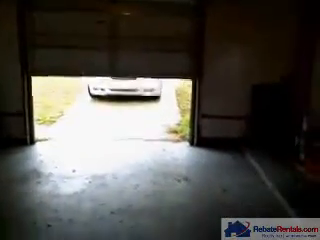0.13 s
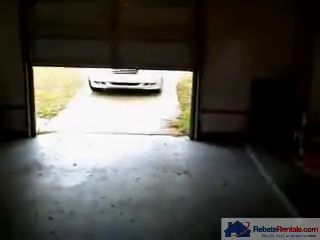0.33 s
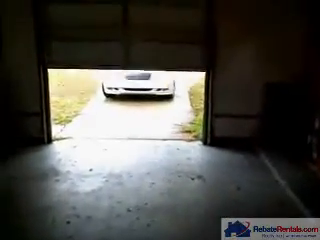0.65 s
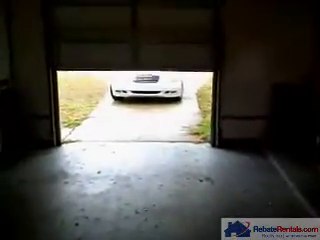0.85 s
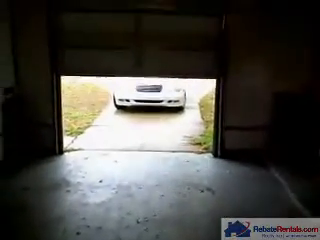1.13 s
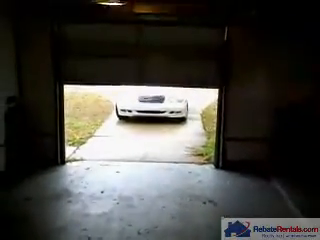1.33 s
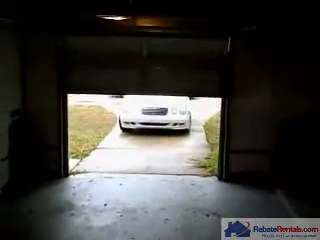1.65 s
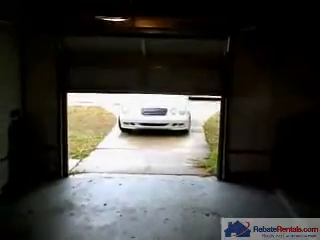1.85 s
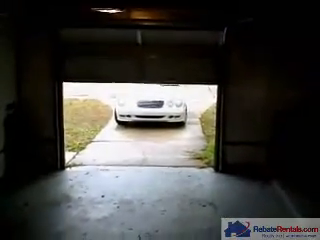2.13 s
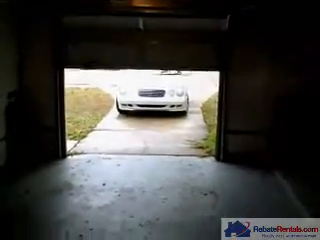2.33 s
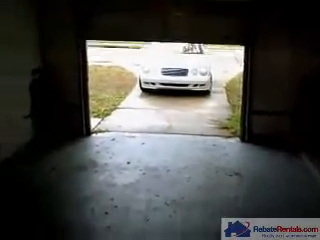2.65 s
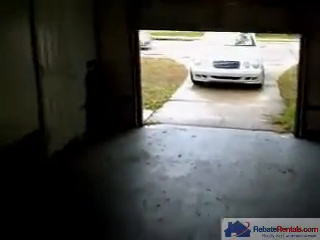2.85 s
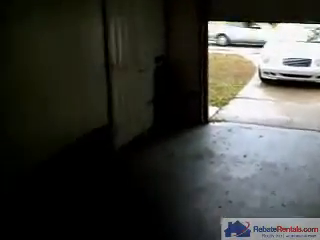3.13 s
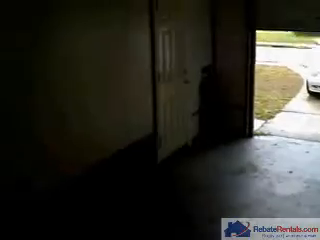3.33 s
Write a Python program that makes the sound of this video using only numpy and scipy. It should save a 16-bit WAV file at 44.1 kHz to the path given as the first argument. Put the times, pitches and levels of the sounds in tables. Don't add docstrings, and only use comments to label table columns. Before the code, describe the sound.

A sectional garage door is hauled up by an electric opener: steady low hum, dense chain and roller rattle, scattered hinge clacks, and a deepening bass shudder near the end, heard by a small microphone inside a bare concrete garage.

```python
import sys
import numpy as np
from scipy import signal
from scipy.fft import rfft, irfft, next_fast_len
from scipy.io import wavfile
from scipy.ndimage import uniform_filter1d

SR = 44100
rng = np.random.default_rng(int(sys.argv[2]) if len(sys.argv) > 2 else 0)


def wav_record(signal):
    frames = np.transpose(np.atleast_2d(signal))
    bounded = np.clip(frames, -1, 1)
    quanta = np.round(bounded * 32767).astype(np.int16)
    wavfile.write(sys.argv[1], SR, quanta)


def natural_amplitude(level_db):
    exponent = np.asarray(level_db, float) / 20
    return 10 ** exponent


N = 154350


def level(x, db):
    return x * natural_amplitude(db) / np.sqrt(np.mean(x ** 2))


def curve(rows, col):
    rows = np.array(rows)
    return np.interp(np.arange(N) / SR, rows[:, 0], rows[:, col])


def colour(x, points):
    size = next_fast_len(len(x) + 4096)
    log_hz = np.log(np.arange(size // 2 + 1) * SR / size + 1)
    p = np.array(points, float)
    edge = np.log(p[:, 0])
    beyond = np.maximum(edge[0] - log_hz, 0) + np.maximum(log_hz - edge[-1], 0)
    db = np.interp(log_hz, edge, p[:, 1]) - 18 * beyond
    return irfft(rfft(x, size) * natural_amplitude(db), size)[:len(x)]


def ring(x, hz, width_hz):
    return signal.lfilter(*signal.iirpeak(hz, hz / width_hz, fs=SR), x)


def walk(rate):
    hold = int(SR / rate)
    steps = np.repeat(rng.standard_normal(N // hold + 1), hold)
    return 1.72 * uniform_filter1d(uniform_filter1d(steps, hold), hold)[:N]


def decay(t60_s):
    t = np.arange(SR // 2) / SR
    noise = rng.standard_normal(len(t)) * np.exp(-np.log(1000) * t / t60_s)
    return level(noise, 0) / np.sqrt(len(t))


def garage(x):
    early = decay(0.048)
    tail = natural_amplitude(4.5) * decay(0.37)
    return signal.fftconvolve(x, early + tail)[:len(x)]


# t/s, level/dB
HUM_LEVEL = [(0.0, -37), (0.04, -30), (1.42, -25), (1.77, -29), (1.84, -26.5), (2.14, -36), (2.2, -24.5),
             (2.27, -30.5), (2.68, -29), (2.76, -42), (2.89, -29.5), (2.96, -32), (3.33, -28.5), (3.5, -36)]
# multiple of the hum, level/dB, level change/(dB per s)
HUM_OVERTONES = [(2, -11.5, -1.3), (5, -28, .5)]


def motor():
    t = np.arange(N) / SR
    phase = 2 * np.pi * 120 * t
    hum = np.sin(phase) * natural_amplitude(curve(HUM_LEVEL, col=1))
    mean = np.sqrt(np.mean(2 * hum ** 2))
    tones = 0
    for multiple, db, fade_db in HUM_OVERTONES:
        strength = mean * natural_amplitude(db + fade_db * t + walk(4.9))
        tones = tones + strength * np.sin(multiple * phase + walk(3) / 10)
    housing_hz, width_hz = 108.2, 16.6
    housing = ring(ring(rng.standard_normal(N), housing_hz, width_hz), housing_hz, width_hz)
    return np.sqrt(2) * (hum + tones) + level(housing, -36)


# f/Hz, level/dB per Hz
RUMBLE_COLOUR = [(22, 0), (45, -0.5), (95, -4), (185, -3.5), (260, -6.5), (430, -12), (620, -10.5),
                 (1000, -20)]
# t/s, level/dB
RAIL_LOAD = [(0, -32.5), (1.3, -32.5), (1.7, -33), (2.2, -30.5), (2.6, -28.5), (3.0, -26), (3.5, -30.5)]


def rumble():
    noise = level(colour(rng.standard_normal(N), RUMBLE_COLOUR), 0)
    bass = signal.sosfilt(signal.butter(2, 260, fs=SR, output="sos"), noise)
    return bass * natural_amplitude(curve(RAIL_LOAD, col=1)) + level(noise - bass, -34)


# t/s, level/dB, share of thin bright jingle level/dB
ROLLER_EFFORT = [(0, -38.5, 5.5), (.1, -30, -14), (.3, -30, -4), (.47, -34.5, -8), (.75, -33.5, 1.5),
                 (.9, -34.5, -2), (1.3, -35, -5.5), (1.43, -35.5, -12), (1.66, -27, -5), (1.88, -32, -15),
                 (2.06, -28, -8), (2.15, -30, -9), (2.35, -30.5, 2.5), (2.58, -29, -13), (2.8, -30, -5),
                 (3.13, -33.5, -15), (3.25, -30.5, -11.5), (3.5, -31.5, -9.5)]
# f/Hz, level/dB per Hz
RATTLE_COLOUR = [(500, -3), (1000, -7.5), (1400, -5.5), (3000, -8), (4300, -7), (5200, -5), (6100, -3.5),
                 (7700, -6.5)]


def rollers():
    size, places = N + SR // 2, 16
    ticks_per_s, spread_db = 2500, 3
    chance = rng.random((size, 2))
    struck = chance[:, 0] < ticks_per_s / SR
    ticks = struck * natural_amplitude(-spread_db * np.log(chance[:, 1] + .004))
    place = rng.integers(0, places, size)
    heard = sum(garage(ticks * (place == k)) for k in range(places))[-N:]
    heard = level(heard * natural_amplitude(0.74 * walk(16)), 0)
    jingle = natural_amplitude(curve(ROLLER_EFFORT, col=2)) * ring(heard, 6150, 1500)
    return colour((heard + jingle) * natural_amplitude(curve(ROLLER_EFFORT, col=1)), RATTLE_COLOUR)


# t/s, peak level/dB, ring f/Hz, ring share level/dB, chatter length/s
HINGE_CLACKS = [(0.075, -27.5, 3000, 3, .025), (.099, -20, 5900, -1.5, 0.028), (.16, -13, 6050, 0.5, 0.039),
                (0.2321, -7.5, 5260, -3, .026), (.5, -24, 5700, -0.5, .025), (1.457, -21, 6270, -11.5, .02),
                (1.534, -18.5, 6000, -9.5, 0.023), (1.6, -20, 6050, 0, 0.02), (1.649, -23.5, 6110, 1, .03),
                (1.758, -16.5, 6200, -2, .025), (1.938, -16.5, 5060, -7.5, .025),
                (1.978, -16, 5970, -5.5, 0.035), (2.189, -23, 6160, -5.5, .025),
                (2.321, -23.5, 6500, 1.5, .025), (2.462, -8, 6200, -2, .028), (2.623, -13, 6200, -10, .03),
                (2.909, -18, 6500, -4, .025), (3.37, -24.5, 6500, -5.5, .025)]
# f/Hz, level/dB per Hz
CLACK_COLOUR = [(700, -12.5), (1500, -10), (3000, -3.5), (4300, -2.5), (5200, -3), (6200, -3), (7700, -3)]


def hinges():
    blow_count, ring_width_hz = 30, 2000
    out = np.zeros(N + SR)
    for start, db, hz, ring_db, chatter_s in HINGE_CLACKS:
        timing, force = rng.random((2, blow_count))
        late = (np.arange(blow_count) + timing) / blow_count
        blows = np.zeros(SR // 2)
        blows[(late * abs(chatter_s) * SR).astype(int)] = (1 - .5 * late) * (0.23 + force ** 2)
        blows[0] = 1.3
        sheet = ring(ring(blows, hz, ring_width_hz), hz, ring_width_hz)
        rung = blows + natural_amplitude(ring_db) * 2 * sheet
        direct = natural_amplitude(2) * rung
        out[int(start * SR):][:SR // 2] += natural_amplitude(db + 1) * (direct + garage(rung))
    return colour(out[:N], CLACK_COLOUR)


# t/s, length/s, f/Hz, level/dB, swell level/dB either side of the middle
PANEL_SHUDDERS = [
    (0.084, 0.42, 33.3, -34, 2),
    (0.743, 0.26, 35, -49, -13.5),
    (1.47, 0.28, 57.9, -32, 1),
    (2.457, .36, 58.7, -23, 0.3),
    (2.862, .27, 58.5, -28, -4.5),
    (3.138, 0.44, 55.5, -40, -10),
    (2.577, 0.19, 35.1, -34, 7),
    (2.866, 1, 33.47, -28, 3.5),
]


def panels():
    t, out = np.arange(N) / SR, 0
    attack_s, release_s, wobble_db = .02, .03, 1
    for start, length, hz, db, swell_db in PANEL_SHUDDERS:
        since = t - start
        shape = np.clip(np.minimum(since / attack_s, 1 + (length - since) / release_s), 0, 1)
        swell = swell_db * (2 * since / length - 1).clip(-1, 1)
        strength = natural_amplitude(db + wobble_db * walk(25) + swell)
        out = out + shape * strength * np.sin(2 * np.pi * hz * since)
    return np.sqrt(2) * out


def scene():
    unit = np.std(colour(rng.standard_normal(N), RATTLE_COLOUR))
    mono = motor() + rumble() + (rollers() + hinges()) / unit + panels()
    return np.array([mono, mono])


# centre t/s, low f/Hz, high f/Hz, level/dB
NOISE_PATCHES = [
    (.281, 4500, 5700, -32),
    (.374, 6850, 8200, -41),
    (1.327, 4150, 5300, -46),
    (1.327, 6850, 8300, -46),
    (1.396, 5150, 7000, -42),
    (2.232, 4150, 5070, -41),
]


def antiphase_noise():
    t, side, length_s = np.arange(N) / SR, 0, 0.04
    for centre, low_hz, high_hz, db in NOISE_PATCHES:
        bandpass = signal.butter(8, [low_hz, high_hz], "band", fs=SR, output="sos")
        band = signal.sosfilt(bandpass, rng.standard_normal(N))
        side = side + level(band, db) * np.cos(np.pi * ((t - centre) / length_s).clip(-.5, .5))
    return side * np.array([[1], [-1]])


def top_cut(x):
    return signal.sosfilt(signal.butter(12, 8590, fs=SR, output="sos"), x)


def record(dry):
    shoulder = signal.butter(26, 7680, fs=SR, output="sos")
    steep = signal.ellip(12, .5, 70, 8240, fs=SR, output="sos")
    mix = signal.sosfilt(shoulder, dry + antiphase_noise())
    mix = signal.sosfilt(steep, mix)
    return top_cut(mix)


dry = scene()
out = record(dry)
wav_record(out)
```